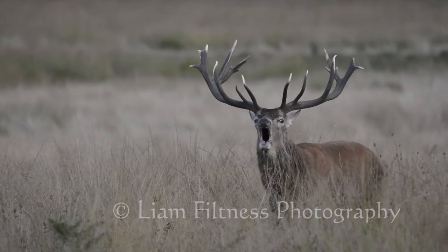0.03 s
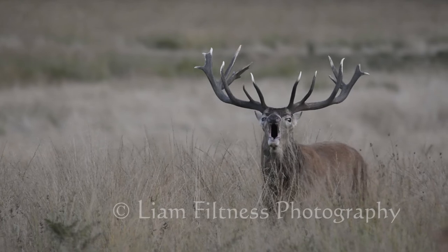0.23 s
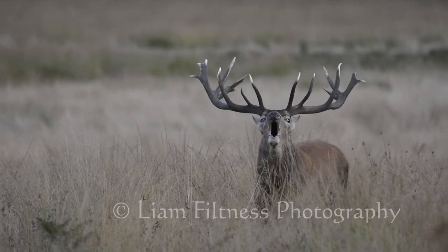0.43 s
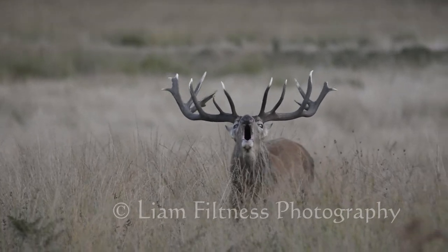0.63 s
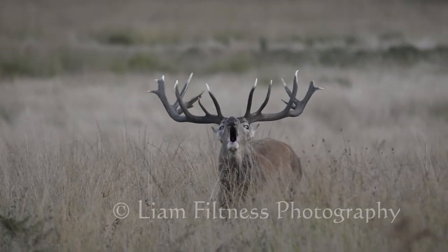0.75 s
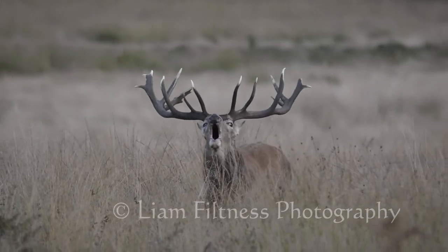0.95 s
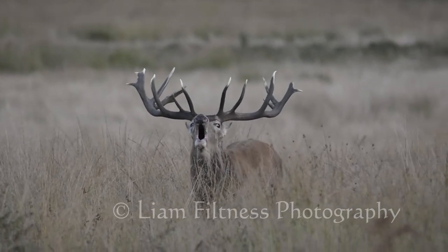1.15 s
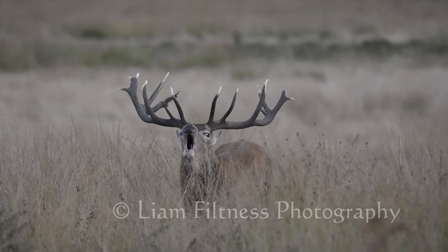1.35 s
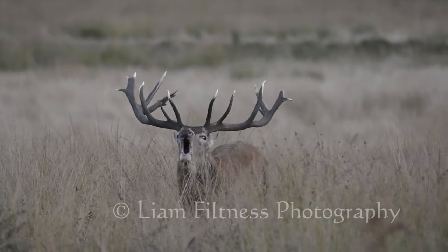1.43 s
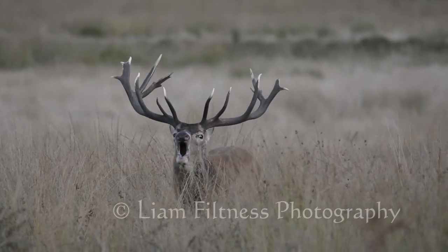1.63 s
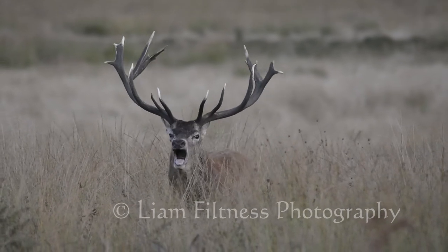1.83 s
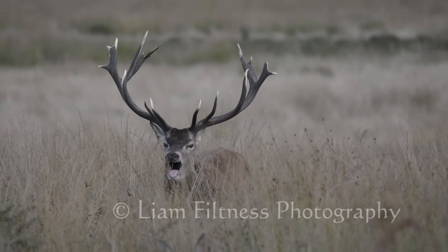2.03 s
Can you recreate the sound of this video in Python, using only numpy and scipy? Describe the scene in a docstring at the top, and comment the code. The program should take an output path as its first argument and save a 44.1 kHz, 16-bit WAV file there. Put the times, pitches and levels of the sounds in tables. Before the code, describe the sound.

A stag gives one long, low, rasping roar in quiet open grassland.

```python
"""A red deer stag roars across open grassland: a few creaky catches of the throat, then one long call
that rises and falls in pitch. Every slap of the vocal folds rings the long throat while the mouth opens,
and the roar scatters off the grass and echoes from far trees. A small bird chirps once at the start and
again as the call ends. Far away a rival roars and three soft hoots sound, over faint air and hiss."""
import sys
import numpy as np
from scipy import signal
from scipy.fft import rfft, irfft
from scipy.io import wavfile
from scipy.ndimage import uniform_filter1d

SR = 44100
rng = np.random.default_rng(int(sys.argv[2]) if len(sys.argv) > 2 else 0)


def store_wav(level_fs):
    """Save 16-bit WAV to argv[1]."""
    pcm = np.round(np.clip(np.atleast_2d(level_fs), -1, 1) * 32767)
    wavfile.write(sys.argv[1], SR, pcm.T.astype(np.int16))


N = 92610


def stag(start_s=0.12, end_s=1.825):
    """Catches of the throat, then a train of vocal fold slaps that steadies as the effort grows."""
    # beat rate of the folds (time [s], pitch [Hz])
    fold_pitch = [(0.36, 93.92), (0.392, 95), (0.424, 99.04), (0.482, 104.6), (0.59, 111), (0.648, 112.4),
                  (0.734, 113), (0.864, 116.9), (1.042, 129.7), (1.07, 130.8), (1.152, 131.7),
                  (1.178, 130.7), (1.292, 122.2), (1.384, 117.4), (1.506, 107.4), (1.604, 106.8),
                  (1.714, 101.4), (1.77, 100.5), (1.802, 93.05), (1.82, 91.4)]
    # force of the roar (time [s], level [dB], bass boost [dB], treble boost [dB])
    effort = [(0.1, -19.5, 9.5, -12), (0.2, -11.5, 3.5, -2), (0.32, -9, 2.5, 0), (0.38, -1.5, -2, -0.5),
              (0.46, 1.5, -2, -3.5), (0.57, 1.5, 1, 1), (0.68, 1.5, -1.5, 4), (0.74, -1.0, -0.5, 3),
              (0.81, 4.5, -4, 1.5), (0.92, 2.5, -1, 2), (0.98, 2.5, 0, 3.5), (1.06, 5.5, -1.5, 6),
              (1.18, 5, -1.5, 8), (1.3, 2, -1, 3), (1.38, 2.5, 0, 3), (1.445, 2.5, 0.5, 6),
              (1.5, 0, 3.5, 6.5), (1.6, 1, 2.5, 6), (1.7, -1, 0, 4), (1.76, -3, 4, 2.5),
              (1.805, -9.5, 5, 1), (1.83, -8.5, -2, 3)]
    # how unevenly the folds beat (time [s], roughness [0-1])
    roughness = [(.12, 0.87), (.31, 0.39), (.39, 0.21), (.52, 0.04), (.66, 0.04), (.85, 0), (.96, 0.05),
                 (1.05, 0.02), (1.16, .02), (1.22, 0.06), (1.34, 0.03), (1.46, 0.03), (1.55, 0),
                 (1.72, 0.04), (1.81, 0.72)]
    # creaks before the voice takes hold (time [s], level [dB])
    catches = [(0.1447, -5), (0.1736, -8.5), (0.2161, -4), (0.2615, -3), (0.2837, -2), (0.317, -12),
               (.3365, -5)]
    jitter_cycles, shimmer_db = 0.049, 2  # at full roughness
    out, t = np.zeros(N), start_s
    waver = np.array([np.tanh(drift(11.01)) for _ in range(36)]).T  # one slow drift per band
    for slip, swell in np.sqrt(3) * (2 * rng.random((N // 100, 2)) - 1):
        if t > end_s:
            break
        rough = np.clip(curve(roughness, t), 0, 1)
        period = 1 / curve(fold_pitch, t + 0.5 / curve(fold_pitch, t))  # pitch at mid-cycle
        onset = t + jitter_cycles * rough * slip * period
        db = curve(effort, t) + shimmer_db * rough * swell
        add_slap(out, onset, db, curve(effort, t, 2), curve(effort, t, 3), rough, waver[int(t * SR)])
        t += period
    for t, db in catches:
        add_slap(out, t, db, bass_db=-1, treble_db=2, rough=0.16, waver=waver[int(t * SR)])
    return out


def add_slap(out, t, db, bass_db, treble_db, rough, waver, size=4096):
    """Mix in one slap of the folds, rung through the throat."""
    hz = np.fft.rfftfreq(size, 1 / SR)
    gain_db = db + throat(t, hz)
    gain_db += bass_db * np.interp(hz, [1200, 1700], [1, 0])
    gain_db += treble_db * np.interp(hz, [2700, 3400], [0, 1])
    # the upper bands waver slowly, and flicker from slap to slap when the voice is rough
    band_db = 7.5 * rough * (2 * rng.random(len(waver)) - 1) + 3.04 * waver
    gain_db += np.interp(hz, np.linspace(0, SR / 4, len(band_db)), band_db) * np.minimum(hz / 3000, 1)
    sample, fraction = divmod(t * SR, 1)
    slap = irfft(ringing(gain_db) * folds(t, hz, rough, size) * delay(hz, fraction / SR))
    lead = size // 64  # room ahead of the attack
    slot = out[int(sample) - lead:int(sample) - lead + size]
    slot += np.roll(slap, lead)[:len(slot)]


def folds(t, hz, rough, size):
    """Spectrum of one closing of the folds: a click, a puff of turbulence and a second flap."""
    # the folds flap again within the cycle (time [s], strength [0-1], lag [s])
    second_flap = [(.36, 0.2, .004), (.56, 0.57, .00398), (.7, 0.43, .00365), (.8, 0, .00365),
                   (1.12, 0.02, .004), (1.24, 0.22, .004), (1.33, 0.4, 0.0034), (1.44, 0.85, .0033),
                   (1.54, .1, .0033)]
    # the folds do not close all at once (frequency [Hz], lag [s])
    closing_lag = [(0, 0.00022), (1100, 0.00027), (1900, .0013), (2350, 0.0018), (2750, 0.000077),
                   (3150, 0.0014), (3600, 0.00022), (4900, .0026), (5800, 0.0011), (9000, 0.0024)]
    puff_decay_s, rough_limit = 0.0068, 0.55
    puff = rng.standard_normal(size) * np.exp(-np.arange(size) / SR / puff_decay_s)
    rasp = min(rough, rough_limit) * np.minimum(hz / 1800, 4)
    pulse = (1 + rasp * rfft(puff / np.linalg.norm(puff))) / np.sqrt(1 + rasp ** 2)
    flap = curve(second_flap, t) * np.interp(hz, [1200, 2100], [0, 1])
    pulse *= (1 + flap * delay(hz, curve(second_flap, t, 2))) / np.sqrt(1 + flap ** 2)
    lag_cycles = np.cumsum(curve(closing_lag, hz)) * hz[1]
    return pulse * np.exp(-2j * np.pi * lag_cycles)


def throat(t, hz):
    """Tone colour in dB of throat, mouth and lips, morphing as the mouth opens."""
    # resonances with the mouth half open (frequency [Hz], half width [Hz], level [dB])
    half_open = [(387.5, 38, -2), (471, 25, -1), (773, 28.6, 2), (1053, 66, 3.5), (1672, 26, -1),
                 (1872, 58, 6), (2014, 25.3, 6.5), (2316, 16, -1.5), (2554, 26, -1), (2696, 157, 4.5),
                 (3090, 180, -11.5), (3805, 70, -7.5), (5010, 140, -22.5), (5680, 95, -23)]
    # neck stretched, mouth wide open (frequency [Hz], half width [Hz], level [dB])
    wide_open = [(134.4, 20, -19.5), (366.3, 22.8, 6), (458.3, 30.8, 3), (723, 53, -1.5), (1045, 41, 13.5),
                 (1314, 12.2, -3.5), (1512, 19, -5), (1708, 14, 8), (1813, 35, 10.5), (1952, 40, 8.5),
                 (2156, 24, 6.5), (2500, 136, 0.5), (2737, 57.6, 7.5), (3009, 65, 3.5), (3270, 87, -9),
                 (3522, 66, -6.5), (4030, 107, -25.5), (4716.0, 40, -22.5), (5080, 93, -23.5),
                 (5780, 114, -26)]
    # mouth travel from half to wide open (time [s], opening [0-1])
    mouth = [(.48, 0), (.6, 0.55), (.7, 0.88), (.82, 0.83)]
    # sizzle above the main resonances (time [s], boost at 4-6 kHz [dB], boost above 6 kHz [dB])
    sizzle = [(.35, 1.5, -3), (.6, 4.5, 1), (.92, 5.5, 7.5), (.98, -4.5, 0), (1.07, 2, -0.5), (1.18, 0, -4),
              (1.3, -4.5, 8.5), (1.39, 2, 1), (1.52, -7, 3), (1.6, 0.5, -3), (1.8, -3.5, -6)]
    # lip resonance that climbs as the mouth opens (time [s], frequency [Hz], boost [dB])
    lips = [(.34, 2260, 4), (.44, 2270, 5.5), (.56, 2280, 6), (.63, 2310, 7), (.72, 3050, -1),
            (.83, 3260, -13), (.94, 3610, 9.5), (1.12, 3530, 0.5), (1.3, 3020, 2), (1.46, 3170, 8),
            (1.56, 3200, -4), (1.68, 3290, 9), (1.8, 3566, 14)]
    # nasal blare (time [s], boost [dB])
    blare = [(.72, 0), (.81, 6.5), (.89, 0.5), (1.21, -1.5), (1.36, -1), (1.44, 3), (1.5, -0.5), (1.6, 3),
             (1.68, -0.5)]
    # dark gaps between the resonances (frequency [Hz], half width [Hz], gain [dB])
    hollows = [(263, 64, -12.5), (2230, 16.7, -3)]
    fizz = (7000, 2600, -47)  # broad top of every slap: Hz, half width Hz, dB
    rise = 1 + 0.41 * max(t - 1.73, 0)  # the throat shortens at the end, lifting its resonances
    opening = np.clip(curve(mouth, t), 0, 1)
    db = (1 - opening) * resonances([*half_open, fizz], hz / rise)
    db += opening * resonances([*wide_open, fizz], hz / rise)
    sizzle_db, top_db = curve(sizzle, t), curve(sizzle, t, 2)
    db += np.interp(hz, [3500, 4600, 5900, 6500], [0, sizzle_db, sizzle_db, top_db])
    db += curve(lips, t, 2) * bump(hz, curve(lips, t), width_hz=93)
    db += curve(blare, t) * bump(hz, 1800, width_hz=330)
    return db + sum(depth * bump(hz, centre, width) for centre, width, depth in hollows)


def grunt():
    """A faint falling tone as the stag's throat lets go."""
    return note(start_s=1.805, length_s=0.07, start_hz=165.5, end_hz=122, db=-61)


def bird():
    """Thin short whistles, most of them falling."""
    # chirps (start [s], length [s], start pitch [Hz], end pitch [Hz], level [dB])
    chirps = [(0, 0.082, 3730, 3620, -53), (1.839, 0.054, 4050, 3460, -54.5),
              (1.815, 0.059, 2335, 2380, -49.5), (1.915, 0.048, 2853, 2590, -55),
              (1.954, .07, 4340, 2385, -54.5), (1.976, 0.036, 5420, 3980, -57.5)]
    return sum(note(*row) for row in chirps)


def rival():
    """A distant roar whose harmonics fade in and out on their way."""
    # the rival's call (time [s], pitch [Hz], level [dB])
    call = [(0, 136, -44.5), (.05, 137.1, -46), (.085, 139.2, -40.5), (.115, 146, -49.5), (.17, 153, -50.5),
            (.22, 160, -40.5), (.27, 163, -53), (.36, 161, -42.5), (.48, 157, -63), (.69, 146, -42),
            (.75, 128, -50.5), (.8, 118, -64)]
    # its throat resonances, dulled by distance (frequency [Hz], half width [Hz], level [dB])
    far_throat = [(443, 85, -0.5), (554, 7.2, -3), (774, 32, -9.5), (945, 75, -8.5), (1173, 126, -14),
                  (1840, 130, -30), (2500, 440, -17)]
    t, voice = np.arange(N) / SR, np.zeros(N)
    hz = curve(call, t) * (1 + 0.0062 * drift(61.2))
    phase = 2 * np.pi * np.cumsum(hz) / SR
    for harmonic in range(3, 30):
        db = resonances(far_throat, harmonic * hz) + 3.5 * drift(25.6)
        voice += undb(db) * np.sin(harmonic * phase + rng.uniform(0, 2 * np.pi))
    fade_out = np.clip((call[-1][0] - t) / 0.022, 0, 1)
    return voice * undb(curve(call, t, 2)) * fade_out


def hoots():
    """Brief far hoots, each sagging slightly in pitch."""
    # hoots (start [s], length [s], start pitch [Hz], end pitch [Hz], level [dB])
    calls = [(0.07, 0.059, 852, 850, -45), (0.38, 0.071, 800, 780, -48.5), (0.83, 0.26, 427, 421, -47)]
    return sum(note(*row) for row in calls)


def echo(x, db, t60_s, top_hz):
    """Dull scatter of a sound, dying away over the grassland."""
    dull_noise = signal.sosfilt(signal.butter(2, top_hz, fs=SR, output="sos"), rng.standard_normal(N))
    tail = dull_noise * undb(-60 * np.arange(N) / SR / t60_s)
    return undb(db) * signal.fftconvolve(x, tail / np.linalg.norm(tail))[:N]


def air(db=-53.5, swell_db=2):
    """A far-off bed of noise that swells a little."""
    # open-air spectrum (frequency [Hz], relative level [dB])
    spectrum = [(20, -33), (50, -8.5), (110, -12), (220, -13), (300, -3), (450, 4.5), (700, 2.5),
                (1080, 2.5), (1500, -4.5), (2000, -4.5), (2800, -8.5), (3800, -5.5), (4800, -18),
                (7000, -24.5), (16000, -51)]
    points_hz, points_db = np.array(spectrum, float).T
    colour_db = np.interp(np.log(np.fft.rfftfreq(N, 1 / SR) + 1), np.log(points_hz), points_db)
    noise = irfft(rfft(rng.standard_normal(N)) * undb(colour_db), N)
    return noise / noise.std() * undb(db + swell_db * drift(23))


def hiss(db=-61.5):
    """Each side of the microphone has its own hiss."""
    band = signal.butter(1, [500, 14000], "bandpass", fs=SR, output="sos")
    return undb(db) * signal.sosfilt(band, rng.standard_normal((2, N)))


def note(start_s, length_s, start_hz, end_hz, db):
    """A short tone that swells, slides and fades."""
    along = np.clip((np.arange(N) / SR - start_s) / length_s, 0, 1)
    hz = (start_hz + (end_hz - start_hz) * along) * (1 + 0.0061 * drift(300))
    return undb(db) * np.sin(np.pi * along) * np.sin(2 * np.pi * np.cumsum(hz) / SR)


def resonances(table, hz):
    """Gain in dB of a set of steep-sided resonances."""
    power = sum(undb(db) ** 2 / (1 + ((hz - centre) / width) ** 2) ** 2 for centre, width, db in table)
    return 10 * np.log10(power)


def ringing(db):
    """Minimum-phase spectrum with the given gain: it rings only after the hit."""
    cepstrum = irfft(np.log(undb(db)))
    half = len(cepstrum) // 2
    cepstrum[1:half] *= 2
    cepstrum[half + 1:] = 0
    return np.exp(rfft(cepstrum))


def bump(hz, centre_hz, width_hz):
    """Bell curve of height 1."""
    return np.exp(-((hz - centre_hz) / width_hz) ** 2)


def delay(hz, lag_s):
    """Spectrum of a pure delay."""
    return np.exp(-2j * np.pi * hz * lag_s)


def drift(rate_hz):
    """Smooth random motion with a spread near 1."""
    hold = int(SR / rate_hz)
    steps = np.repeat(rng.standard_normal(N // hold + 1), hold)
    return 1.43 * uniform_filter1d(uniform_filter1d(steps, hold), hold)[:N]


def curve(table, at, column=1):
    """One column of a table, joined by straight lines."""
    rows = np.array(table, float)
    return np.interp(at, rows[:, 0], rows[:, column])


def undb(db):
    """Decibels to gain."""
    return 10 ** (np.asarray(db) / 20)


def scene():
    """Stag, bird, their echoes and the far calls, all almost straight ahead."""
    near = stag() + grunt() + bird()
    grass = echo(near, db=-17.5, t60_s=0.19, top_hz=3380)
    trees = echo(near, db=-37.5, t60_s=3.8, top_hz=1000)
    right = near + grass + trees + rival() + hoots() + air()
    left = undb(-0.2) * irfft(rfft(right) * delay(np.fft.rfftfreq(N, 1 / SR), lag_s=8e-6), N)
    return np.array([left, right]) + hiss()


def record(dry):
    """A steep low-pass cuts the very top."""
    return signal.sosfilt(signal.ellip(10, 0.1, 80, 15750, fs=SR, output="sos"), dry)


dry = scene()
out = record(dry)
store_wav(out)
```